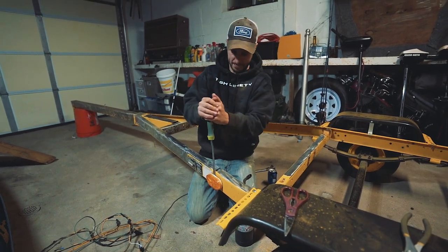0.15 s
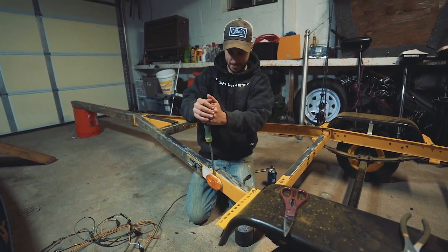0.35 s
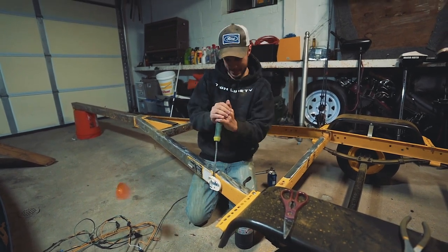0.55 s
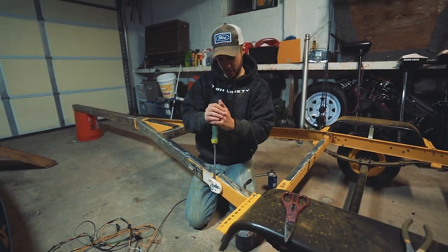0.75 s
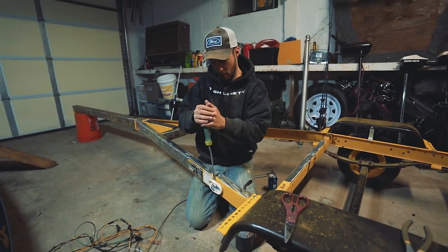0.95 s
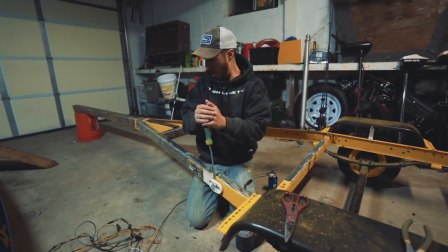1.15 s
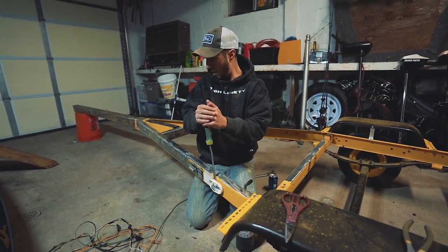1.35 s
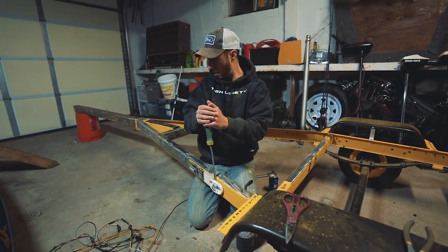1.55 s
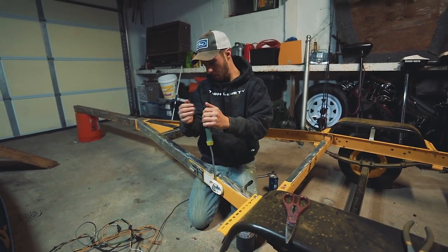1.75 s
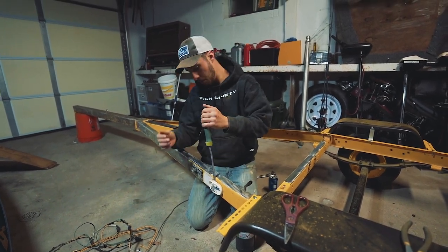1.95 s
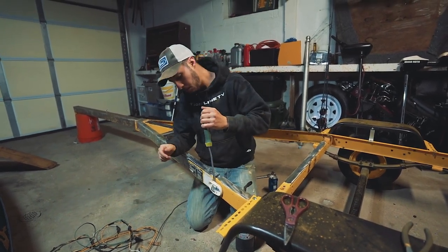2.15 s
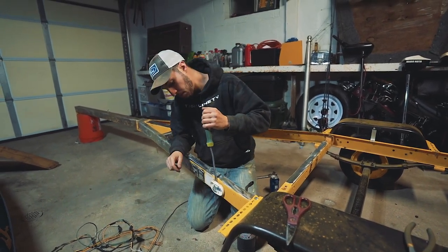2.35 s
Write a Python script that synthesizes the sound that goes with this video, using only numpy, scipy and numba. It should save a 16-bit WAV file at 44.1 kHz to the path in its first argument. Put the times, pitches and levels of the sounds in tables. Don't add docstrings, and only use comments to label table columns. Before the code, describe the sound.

Screwdriver blows crack on a steel trailer frame from 0 to 0.27 s, with a short bright scrape, then again around 0.5 s, the steel ringing briefly. At 0.76 s the blade scrapes and chatters; at 0.84 s a plastic lens snaps free, bouncing and skittering hollowly over concrete, fading past 2 s. A soft knee thud at 2.1 s, faint cloth at 2.4 s. Garage echo, low rumble and hiss, clipped peaks.

```python
import sys
import numpy as np
from scipy import signal
from scipy.fft import rfft, irfft
from scipy.io import wavfile
from scipy.ndimage import uniform_filter1d
from numba import njit

SR = 44100
rng = np.random.default_rng(int(sys.argv[2]) if len(sys.argv) > 2 else 0)


def attenuation_scalar(level_db):
    decades = np.asarray(level_db, float) / 20
    return 10 ** decades


def log_audio(samples):
    frames = np.atleast_2d(samples).T
    limited = np.clip(frames, -1, 1)
    pcm = np.round(limited * 32767).astype(np.int16)
    wavfile.write(sys.argv[1], SR, pcm)


N = 109544

# (time [s], level [dB], contact pitch [Hz], sharp crack [dB], frame ring [dB])
BLOWS = [(.0002, 1, 1730, -21, 11), (.005, 15, 1570, 0, -21), (.0197, -20, 1700, -9.5, -13),
         (0.024, 3.5, 1500, 9.5, -18), (.095, -3.5, 1320, -32, 3.5), (.117, -23.5, 990, -16, 1.5),
         (0.2191, 0.5, 1750, -13, 5), (.2415, -8, 1580, -21.5, -4.5), (.2618, 10, 1570, 0.5, -7.5),
         (.488, 3, 1620, -14, -2.5), (.4955, -4.5, 1670, -0.5, -8), (.5055, -22, 1960, -7, -2.5),
         (.515, -14.5, 1200, -20, 14.5), (.527, 10.5, 900, -8, -3.5), (.566, -3.5, 2360, -34, -0.5),
         (.76, -13, 820, 8, 9.5)]
# (start [s], length [s], level [dB], centre [Hz])
SCRAPES = [
    (0.175, 0.026, -15, 5500),
    (0.7565, 0.088, -18.5, 2760),
]
# (time [s], level [dB])
CHATTER = [
    (.7737, 0),
    (.7903, -1),
    (.8017, -4),
    (.8155, -3),
    (.830, 0),
    (.8418, 0),
]
# (pitch [Hz], level [dB], time to fade by 60 dB [s])
FRAME_TONES = [(142.5, 2.5, .28), (561.6, -7, 0.2), (752, 4, 0.1), (851, -0.5, 0.063), (985.2, -9, 0.4),
               (1200, -3, 0.2), (1416, 2.5, 0.033), (1750, 6, 0.033), (1933, -7.5, 0.3), (2540, -12.5, 0.3),
               (4050, -16, 0.044), (4260, -1, 0.032)]
# (pitch [Hz], width [Hz], level [dB])
LENS_TONES = [(755, 30, -12), (1410, 60, -6), (2195, 70, 2), (2750, 250, -8), (3290, 150, -3),
              (3740, 80, -2), (4620, 80, -4), (5650, 300, -9), (6650, 320, -10), (8100, 450, -19),
              (9200, 400, -20), (10500, 500, -27), (11900, 500, -28), (13600, 500, -33)]
# (time [s], level [dB], rim click [dB], scuff time to fade by 60 dB [s])
BOUNCES = [(.842, 4.5, -12, 0.022), (.853, -1.5, 13, 0.038), (.95, -15, -31, 0.022),
           (1.073, -15.5, -9, 0.045), (1.166, -12.5, -11.5, .05), (1.179, -19, 1.5, 0.025),
           (1.277, -55, -7, 0.02), (1.42, -24.5, -3.5, 0.15), (1.6, -55, -9, 0.052),
           (1.775, -26.5, 1.5, 0.03), (1.8, -26.5, -4, 0.052), (1.825, -40, -16, 0.025),
           (1.887, -28, 3, 0.16), (1.994, -35.5, 11.5, 0.1), (2.19, -34.5, -7, 0.029),
           (2.28, -46.5, 3, 0.12)]
# (time [s], level [dB], rim share [dB])
SKITTER = [(.85, -10, -18.5), (.95, -27, -34), (1.0, -54, -15), (1.07, -44.5, -11), (1.092, -23.5, 0.5),
           (1.152, -44, -7), (1.202, -21.5, -6), (1.3, -32.5, -15.5), (1.4, -26.5, -12), (1.46, -29, -12),
           (1.58, -27.5, -7.5), (1.72, -33.5, -6), (1.87, -40, -15), (1.92, -31, -22), (2.07, -38, -27),
           (2.201, -43, -20), (2.33, -52.5, -30.5), (2.4, -81, -20)]
# (time [s], level [dB])
TICKS = [
    (.447, -36),
    (2.103, -57),
    (2.121, -37),
    (2.213, -54),
    (2.278, -51),
    (2.341, -60),
    (2.435, -50),
]
# (pitch [Hz], time [s])
ECHO_FADE = [(125, 0.59), (250, 0.43), (500, 0.34), (1000, 0.42), (2000, 0.41), (4000, 0.36), (8000, 0.26),
             (13500, 0.073)]
# (pitch [Hz], level [dB per Hz])
FLOOR_SPECTRUM = [(12, -7.5), (28, 5), (60, -19), (150, -26), (500, -27.5), (3000, -29), (8000, -42),
                  (16000, -61)]


def unit(x):
    return x / np.sqrt(np.mean(x ** 2))


def band(x, hz, width):
    return signal.lfilter(*signal.iirpeak(min(hz, .45 * SR), hz / width, fs=SR), x)


def fade(t, t60):
    return np.exp(-np.log(1000) * t / t60)


def burst(t60, rise=0.00026):
    t = np.arange(SR // 10) / SR
    shape = fade(t, t60) * np.minimum(t / rise + 0.17, 1)
    z = rfft(rng.standard_normal(len(t)) * shape)
    even = irfft(z / np.abs(z), len(t))
    return even * shape ** .25 * np.sqrt(np.sum(shape ** 2))


def add(out, s, x):
    i = int(max(s, 0) * SR)
    out[i:i + len(x)] += x[:N - i]


def ring(push, tones):
    t = np.arange(SR // 2) / SR
    luck = 3.2 * rng.standard_normal(len(tones))
    body = np.zeros(len(t))
    for (hz, db, t60), luck_db in zip(tones, luck):
        body += attenuation_scalar(db + luck_db) * np.sin(2 * np.pi * hz * t) * fade(t, t60)
    return signal.fftconvolve(body, push)


def blade():
    chatter_db, chatter_hz, chatter_crack_db, chatter_ring_db = -0.5, 3220, 7, -26
    frame_db = -37
    out = np.zeros(N)
    levering = [(s, db + chatter_db, chatter_hz, chatter_crack_db, chatter_ring_db) for s, db in CHATTER]
    for s, db, hz, crack_db, ring_db in BLOWS + levering:
        touch = band(burst(t60=0.016), hz, 0.89 * hz)
        snap = burst(t60=0.011)
        crack = band(snap, 7310, 1900) + 0.55 * band(snap, 13100, 3300) + 0.26 * band(snap, 4860, 2800)
        add(out, s, attenuation_scalar(db) * (2.42 * touch + attenuation_scalar(crack_db) * crack))
        add(out, s, attenuation_scalar(db + frame_db + ring_db) * ring(touch, FRAME_TONES))
    for s, length, db, hz in SCRAPES:
        n = int(length * SR)
        grit = rng.standard_normal(n) * attenuation_scalar(rng.exponential(size=n))
        rise = np.minimum(np.arange(n) / (0.0053 * SR), 1)
        add(out, s, attenuation_scalar(db) * unit(band(grit, hz, 1.97 * hz)) * rise)
    return out


def walk(rate):
    k = int(SR / rate)
    steps = np.repeat(rng.standard_normal(N // k + 1), k)
    return 1.3 * uniform_filter1d(steps, k)[:N]


def skitter():
    contacts_per_s, scatter_db, skitter_db = 1500, 4, 9
    t = np.arange(N) / SR
    times, level_db, rim_db = np.array(SKITTER).T
    hits = (rng.random(N) < contacts_per_s / SR) * rng.standard_normal(N)
    patter = unit(hits * attenuation_scalar(scatter_db * np.minimum(rng.exponential(size=N), 3)))
    patter = patter * attenuation_scalar(np.interp(t, times, level_db) + skitter_db) * (t > times[0])
    return patter, patter * attenuation_scalar(np.interp(t, times, rim_db))


def shell(push, tilt, rock):
    out = np.zeros(N)
    for k, (hz, width, db) in enumerate(LENS_TONES):
        tone = band(push, hz, min(width + 20, hz / 18))
        out += (-1) ** k * attenuation_scalar(tilt * db + rock[k]) * tone
    return out


def lens():
    face, edge = skitter()
    for s, db, rim_db, scuff_t60 in BOUNCES:
        tap = burst(scuff_t60, rise=0.002)
        add(face, s, 8.1 * attenuation_scalar(db) * tap)
        add(edge, s, 4.73 * attenuation_scalar(db + rim_db) * tap)
    rock = [2.2 * walk(rate=9) for _ in LENS_TONES]
    body = shell(face, 0.92, rock)
    body = body + attenuation_scalar(-15) * band(band(face, 3900, 3800), 3900, 3800)
    body = body + attenuation_scalar(-28.5) * band(band(face, 960, 650), 960, 650)
    dull_body = signal.sosfilt(signal.butter(4, 7200, fs=SR, output="sos"), body)
    rim = band(edge, 7100, 4200)
    return dull_body + shell(rim, 0.67, rock) + 0.053 * rim


def man():
    knee_s, knee_db, knee_hz = 2.102, -32.5, 134
    shuffle_s, shuffle_db, shuffle_rise_s = 2.403, -47.5, 0.09
    out = np.zeros(N)
    t = np.arange(N) / SR
    for s, db in TICKS:
        add(out, s, attenuation_scalar(db) * band(burst(0.005), 13000, 5000))
    thud = burst(0.1)
    low = band(band(thud, knee_hz, 75), knee_hz, 75)
    slap = band(band(thud, 600, 900), 480, 900)
    add(out, knee_s, attenuation_scalar(knee_db) * (5.7 * low + 1.9 * slap))
    cloth = unit(band(band(rng.standard_normal(N), 1050, 3400), 870, 3600))
    return out + attenuation_scalar(shuffle_db) * np.clip((t - shuffle_s) / shuffle_rise_s, 0, 1) * cloth


def garage(x):
    t = np.arange(SR) / SR
    tail = np.zeros(SR)
    for hz, t60 in ECHO_FADE:
        edges = [hz / np.sqrt(2), hz * np.sqrt(2)]
        octave = signal.butter(2, edges, "band", fs=SR, output="sos")
        tail += signal.sosfilt(octave, rng.standard_normal(SR)) * fade(t, t60)
    tail *= 1 - np.exp(-t / 0.015)
    return signal.fftconvolve(x, tail / np.sqrt(np.sum(tail ** 2)))[:N]


def floor():
    f = np.arange(N // 2 + 1) * SR / N + 1
    hz, db = np.array(FLOOR_SPECTRUM).T
    shape = attenuation_scalar(np.interp(np.log(f), np.log(hz), db))
    return attenuation_scalar(-47.5) * unit(irfft(rfft(rng.standard_normal(N)) * shape, N))


@njit
def limiter(x, top, grab, let_go):
    y, e = np.empty(len(x)), 4 * top
    for i in range(len(x)):
        a = abs(x[i])
        e += (a - e) * (grab if a > e else let_go)
        y[i] = x[i] * min(1., top / e)
    return y


def scene():
    near = blade() + lens() + man()
    echo = attenuation_scalar(0.5) * garage(near)
    return (near + echo + floor())[None]


def roll_off(x):
    return signal.sosfilt(signal.butter(12, 16370, fs=SR, output="sos"), x)


def record(dry):
    limit_db, grab_s, let_go_s, top_hz = -15, 0.0025, 0.03, 16000
    x = limiter(dry[0], 2 * float(attenuation_scalar(limit_db)), 1 / (grab_s * SR), 1 / (let_go_s * SR))
    top_cut = signal.ellip(8, 0.2, 60, top_hz, fs=SR, output="sos")
    x = signal.sosfilt(top_cut, np.clip(x, -1, 1))
    mix = np.clip(x, -1, 1)[None]
    return roll_off(mix)


dry = scene()
out = record(dry)
log_audio(out)
```